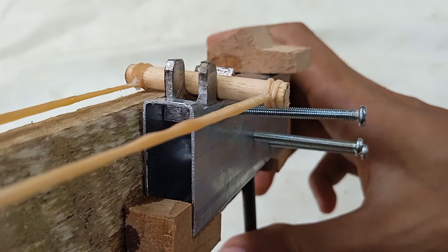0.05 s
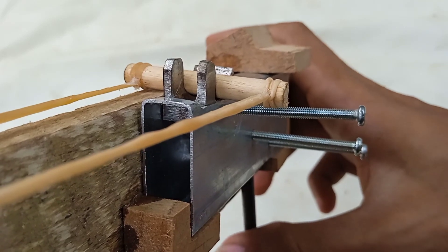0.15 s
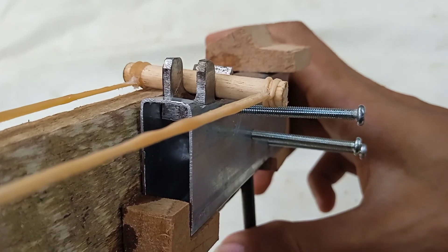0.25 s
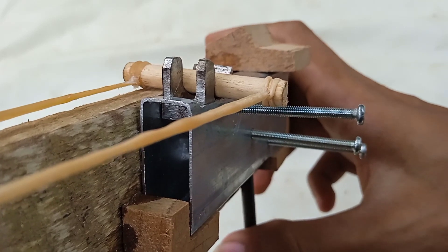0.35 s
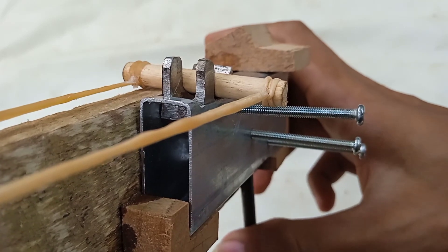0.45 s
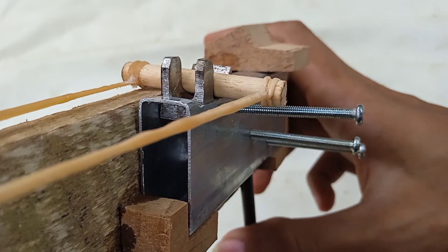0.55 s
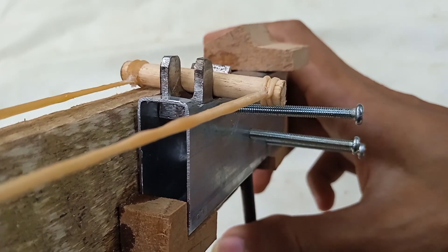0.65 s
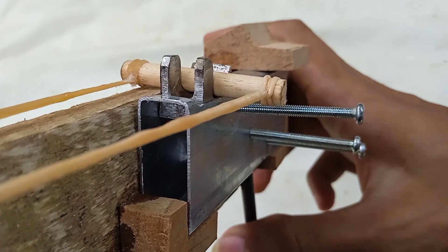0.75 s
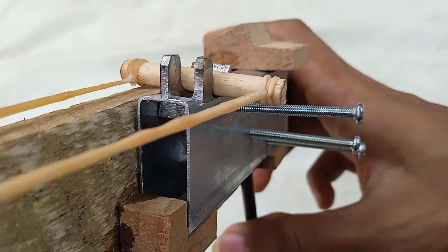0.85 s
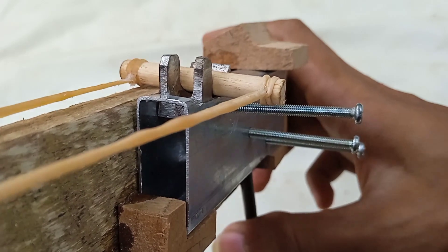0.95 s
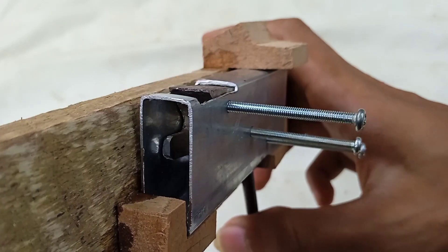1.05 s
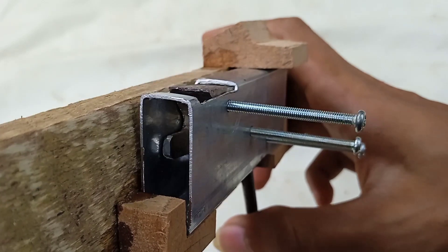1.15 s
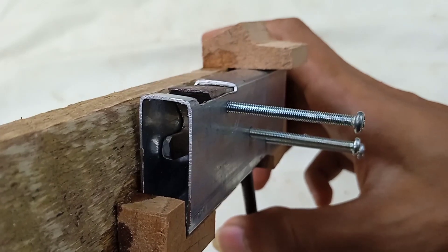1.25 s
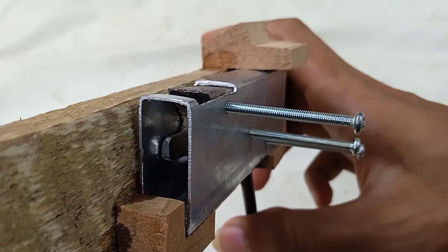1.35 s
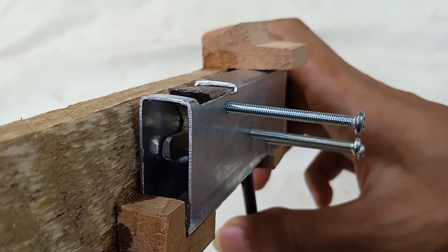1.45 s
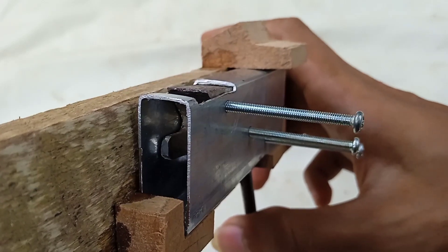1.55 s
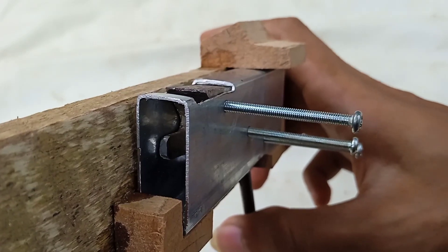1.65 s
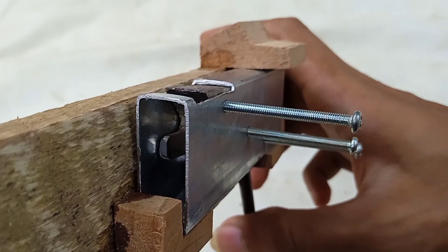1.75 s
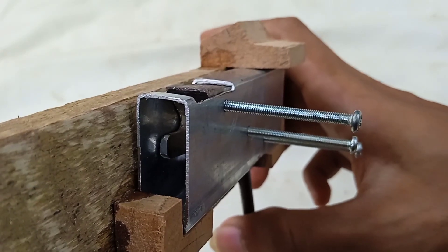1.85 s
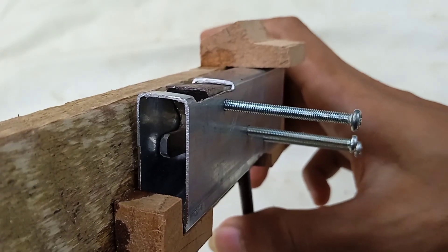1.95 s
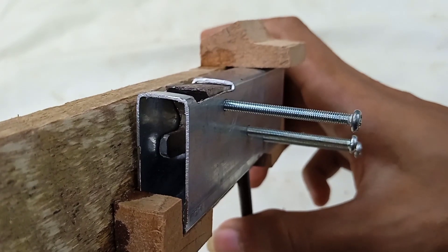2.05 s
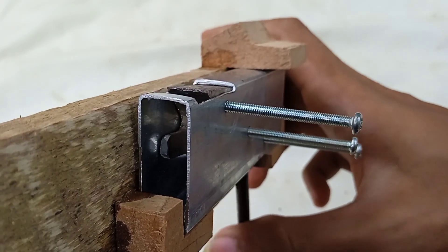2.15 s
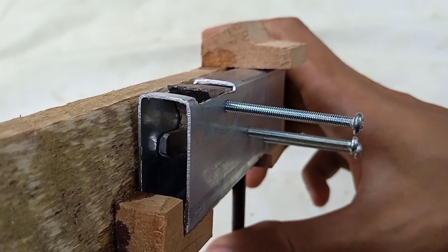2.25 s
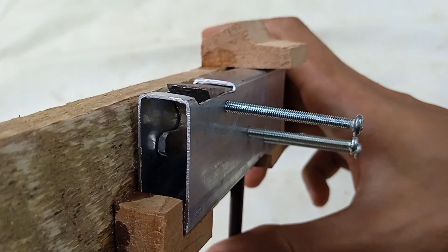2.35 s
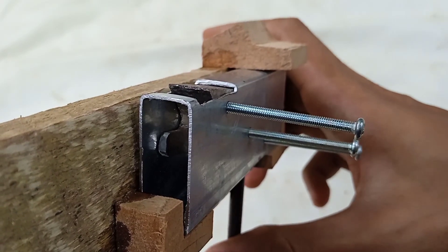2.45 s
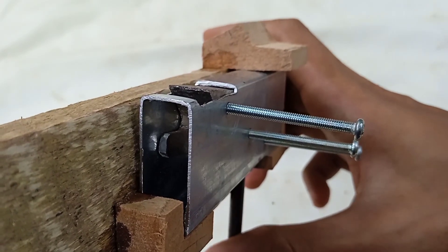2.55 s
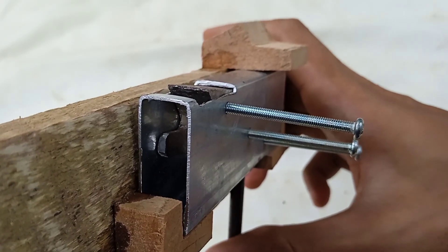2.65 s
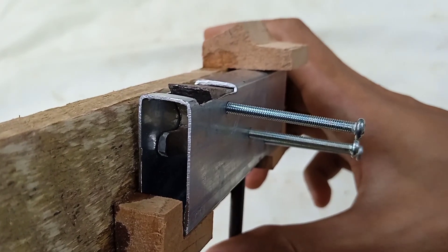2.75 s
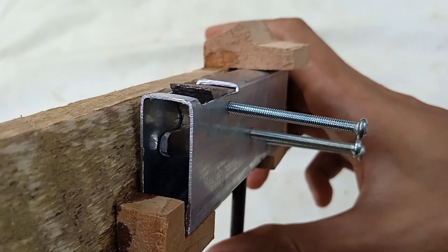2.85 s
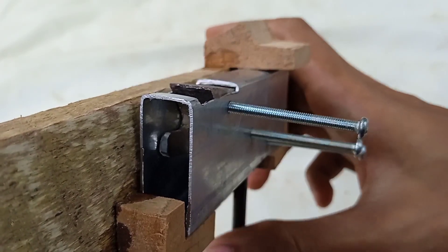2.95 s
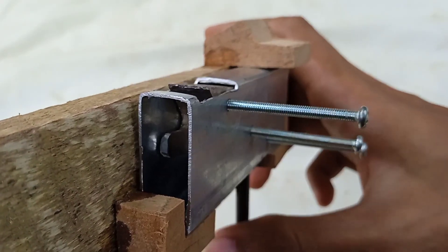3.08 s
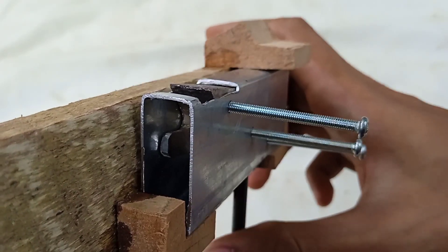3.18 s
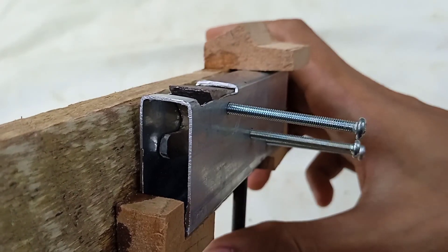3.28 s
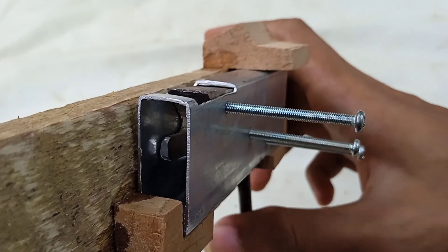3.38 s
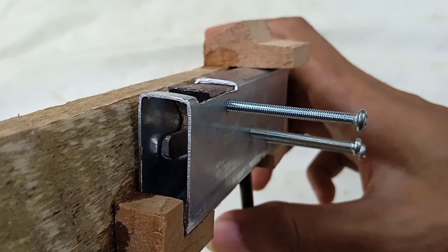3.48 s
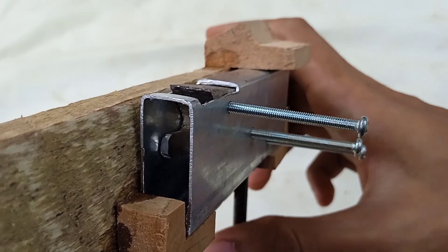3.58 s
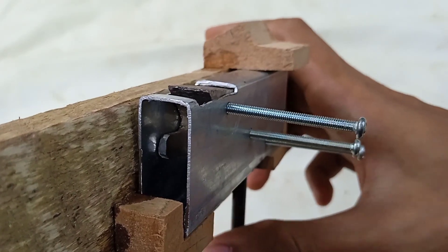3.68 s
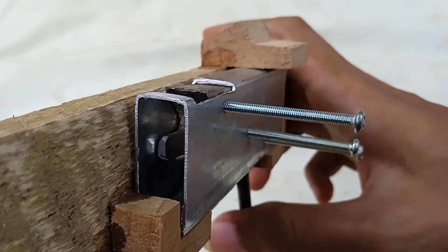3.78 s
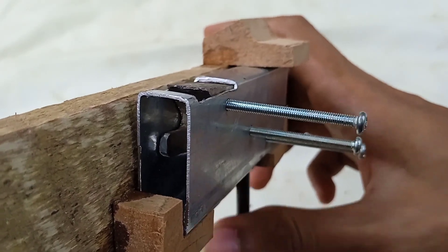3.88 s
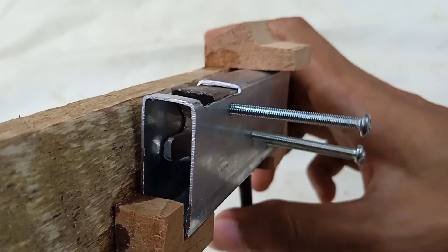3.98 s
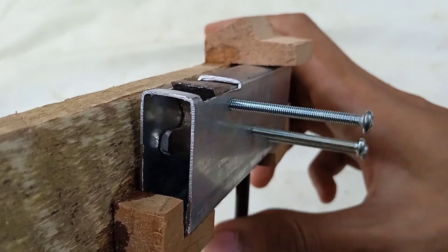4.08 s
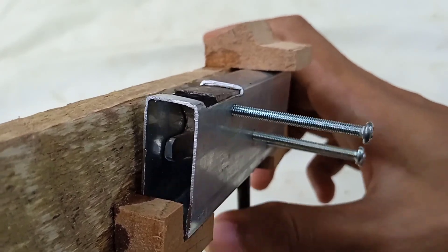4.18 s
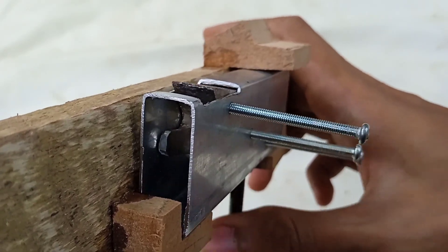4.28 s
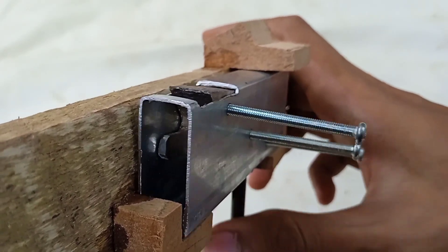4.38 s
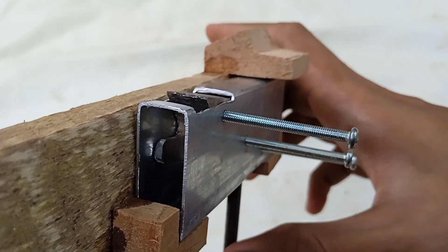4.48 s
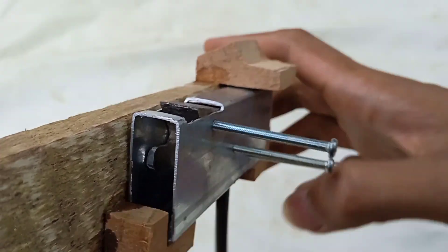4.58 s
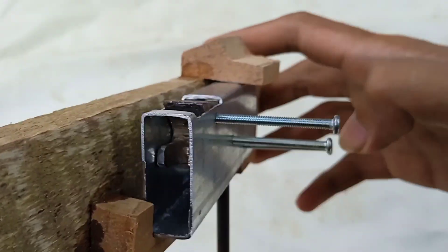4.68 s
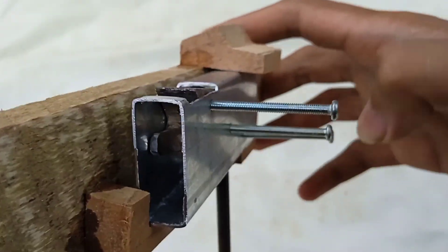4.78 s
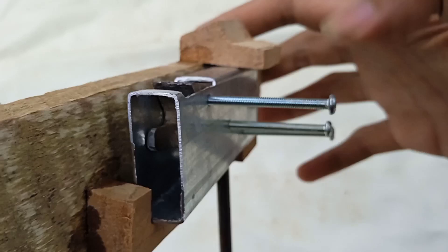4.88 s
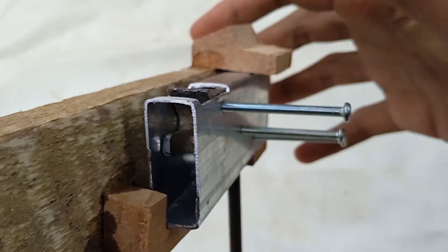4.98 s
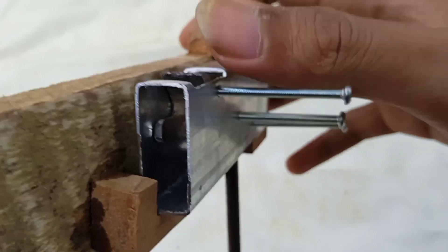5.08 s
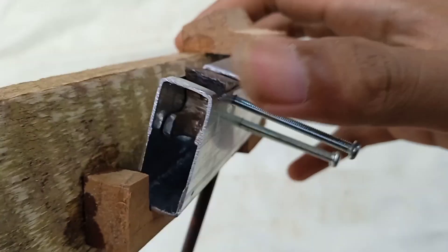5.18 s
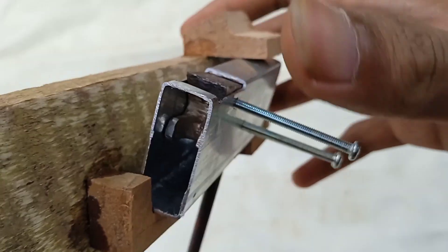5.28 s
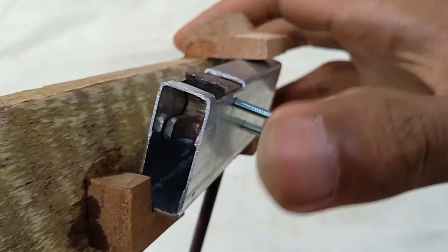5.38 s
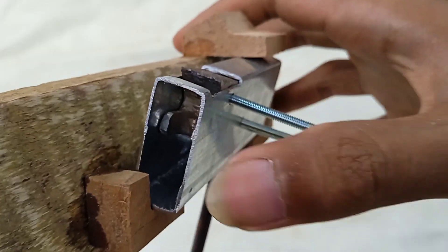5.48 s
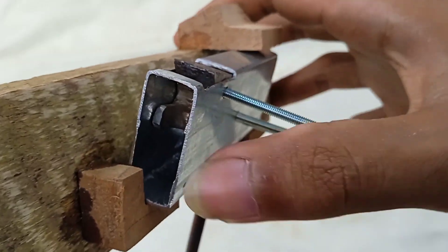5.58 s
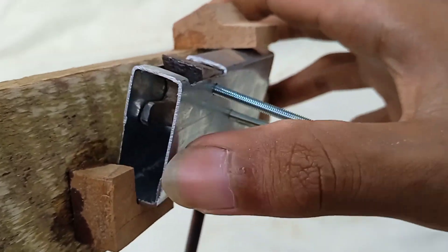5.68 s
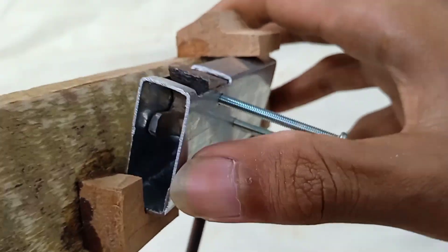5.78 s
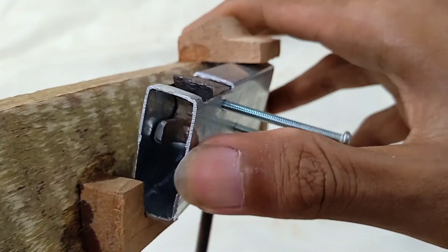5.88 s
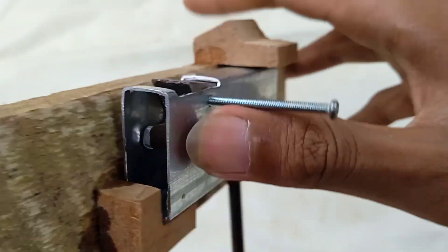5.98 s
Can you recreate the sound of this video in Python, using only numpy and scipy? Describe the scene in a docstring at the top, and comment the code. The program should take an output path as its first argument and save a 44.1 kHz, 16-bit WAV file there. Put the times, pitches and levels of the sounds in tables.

```python
"""First a low traffic rumble, a slowing far engine and a steadily trilling insect: shaped noise and tones.
A few far birds join in with gliding tones and bursts of high noise.
Close by, the steel catch of a homemade rubber-band crossbow lets go and slams round in its bracket on
the wooden stock: damped modes and noise. Then a hand works the trigger: loose screws scrape and click
in their holes, heard as grains of noise and small rings, and a thumb flicks their free ends."""
import sys
import numpy as np
from scipy import signal
from scipy.fft import rfft, irfft, next_fast_len
from scipy.io import wavfile
from scipy.ndimage import map_coordinates

SR = 44100
rng = np.random.default_rng(int(sys.argv[2]) if len(sys.argv) > 2 else 0)


def unload_wav(signal):
    """Save mono or channel-first audio to the path in sys.argv[1] as 16-bit WAV at rate SR, clipped to [-1, 1]."""
    wavfile.write(
        sys.argv[1],
        SR,
        np.round(np.clip(np.atleast_2d(signal).T, -1, 1) * 32767).astype(np.int16),
    )


N = 265923

# modes of the steel bracket: (frequency [Hz], level [dB], t60 [s])
STEEL = [(1670, -14.5, 0.021), (2178, 3, 0.018), (2436, -9.5, 0.043), (2530, -16, 0.053),
         (2775, -16.5, 0.046), (3410, -16.5, .02), (3842, -28, 0.053), (4650, -22, 0.021),
         (4980, -26.5, 0.015), (6144, -19.5, 0.04), (6750, -24.5, 0.016)]
# spectrum of the crack of rough steel faces: (frequency [Hz], relative density [dB per Hz])
CRACK = [(200, -28), (1000, -15.5), (2500, 1.5), (3200, -1), (4300, 3.5), (5000, -2.5), (6500, -1),
         (7600, -8), (10000, -10.5), (12800, -23), (14000, -17), (15200, -6), (16000, -7.5)]
# pushes of the hand that drag the screw threads over the bracket:
# (time of the hardest moment [s], rise [s], fall [s], level [dB])
STROKES = [(2.243, .02, 0.013, -67), (2.335, 0.091, 0.042, -69), (2.445, 0.052, 0.022, -70.5),
           (3.064, .026, 0.031, -56), (3.125, 0.036, 0.025, -72), (3.197, .056, 0.052, -60.5),
           (3.452, 0.049, 0.03, -55.5), (3.645, .062, .055, -56), (3.847, .048, .04, -53),
           (3.988, .055, 0.06, -54), (4.056, .032, 0.049, -53), (4.190, 0.065, 0.025, -52),
           (4.243, 0.023, 0.033, -53.5), (4.341, .048, 0.037, -47), (4.385, .02, .026, -49.5),
           (4.470, .046, .045, -53.5), (4.690, .02, .022, -55.5), (4.748, .022, 0.012, -57.5),
           (5.933, .016, 0.0286, -57), (5.988, .008, 0.0264, -62.5)]


def amp(db):
    """Level to amplitude: 20 dB is a factor of ten."""
    return 10 ** (np.asarray(db) / 20)


def unit(x):
    """Power normalisation: scale to rms 1."""
    return x / np.sqrt(np.mean(x ** 2) + 1e-20)


def blow(x):
    """Energy normalisation: scale to the energy of a full-scale sine lasting 5 ms."""
    energy = np.sum(x ** 2)
    return x * np.sqrt(0.0025 * SR / (energy + 1e-20))


def along(points, hz):
    """Interpolation of (frequency [Hz], value) points on a logarithmic frequency axis."""
    f, v = np.transpose(points)
    return np.interp(np.log(hz + 1), np.log(f + 1), v)


def curves(rows):
    """Linear interpolation in time: one value per sample for each column after the time."""
    s, *cols = np.transpose(rows)
    return [np.interp(np.arange(N) / SR, s, c) for c in cols]


def wobble(rate):
    """Band-limited random fluctuation: a smooth curve through random knots, rate of them a second."""
    knots = rng.standard_normal(int(N * rate / SR) + 4)
    return map_coordinates(knots, [np.arange(N) * rate / SR])


def filtered(x, response):
    """Linear filtering: the spectrum of x times a response of frequency."""
    m = next_fast_len(len(x) + 8192)
    spectrum = rfft(x, m) * response(np.fft.rfftfreq(m, 1 / SR))
    return irfft(spectrum, m)[:len(x)]


def noise(spectrum, size):
    """Spectral shaping: white noise coloured by a spectrum, of rms 1."""
    return unit(filtered(rng.standard_normal(size), lambda hz: amp(along(spectrum, hz))))


def add(track, s, x):
    """Superposition: mix x into the track at time s."""
    i = max(round(s * SR), 0)
    track[i:i + len(x)] += x[:max(len(track) - i, 0)]


def engine():
    """Harmonic orders: multiples of a steadily slowing firing rate, each fading in and out on its own."""
    # level of the far engine: (time [s], level [dB])
    engine_level = [(0, -61), (.4, -61), (1, -72), (1.7, -73), (2.6, -83), (3.25, -65), (4, -68),
                    (4.6, -71.5), (5.2, -75.5), (6, -70)]
    # orders: (multiple of the firing rate, relative level [dB])
    order_levels = [(2, -12), (3, 1), (4, -3), (5, -15.5), (6, -20.5)]
    firing_hz, sag_hz_per_s = 41.5, 1.65
    db, = curves(engine_level)
    hz = firing_hz - sag_hz_per_s * np.arange(N) / SR
    drift_hz = 0.25 * wobble(6)
    phase = 2 * np.pi * np.cumsum(hz + drift_hz) / SR
    orders = np.zeros(N)
    for multiple, level in order_levels:
        fading = amp(level + 2 * wobble(3))
        orders += fading * np.sin(round(multiple) * phase + 0.5 * wobble(8))
    return amp(db) * unit(orders)


def background():
    """Incoherent sum of sources: swelling traffic noise, hissing air, a faint hum and a far engine."""
    # levels of the distant traffic and of the hiss of air: (time [s], level [dB])
    traffic_level = [(0, -61), (.45, -64.5), (1.5, -67), (2.45, -71.5), (3.4, -67), (4.1, -69), (4.35, -71),
                     (4.6, -69), (5.1, -70.5), (6.03, -69.5)]
    air_level = [(0, -77), (.4, -75.5), (.9, -79), (2.5, -81), (6.03, -80.5)]
    # spectra of the traffic and of the air: (frequency [Hz], relative density [dB per Hz])
    rumble_spectrum = [(15, -59.5), (25, -31), (41, -20), (114, 0.5), (168, -7), (188, -7), (245, -12.5),
                       (274, -13.5), (348, -19.5), (436, -36.5), (500, -24.5), (650, -55.5), (1100, -120)]
    air_spectrum = [(200, -10), (400, 2.5), (700, -0.5), (1500, -6), (3000, -12.5), (4500, -18),
                    (7000, -19), (10000, -28), (13500, -26), (15000, -22), (16000, -17)]
    # the hum: (centre frequency [Hz], level [dB])
    hum_hz, hum_db = (347, -88)
    traffic_db, = curves(traffic_level)
    air_db, = curves(air_level)
    rumble = amp(traffic_db) * noise(rumble_spectrum, size=N)
    air = amp(air_db + 0.4 * wobble(5)) * noise(air_spectrum, size=N)
    hum_phase = 2 * np.pi * np.cumsum(hum_hz + wobble(1.3)) / SR
    hum = amp(hum_db) * unit(np.sin(hum_phase))
    return rumble + air + hum + engine()


def insect():
    """Modulated carrier: a thin tone creeping upward, with random sidebands heard as a fluttering trill."""
    # level of the insect: (time [s], level [dB])
    insect_level = [(0, -79), (1, -81.5), (1.7, -78), (2.8, -84.5), (4.8, -78.5), (6, -79)]
    start_hz, rise_hz_per_s = 5383, 12
    flutter_db = -1.5  # gain of the flutter beside the tone
    db, = curves(insect_level)
    phase = 2 * np.pi * np.cumsum(start_hz + rise_hz_per_s * np.arange(N) / SR) / SR
    tone = np.sin(phase + wobble(30))
    flutter = wobble(150) * np.sin(phase) + wobble(150) * np.cos(phase)
    return amp(db) * unit(tone + amp(flutter_db) * flutter)


def birds():
    """Frequency modulation for far whistles that glide and level off; band noise for short high buzzes."""
    # gliding whistles: (time [s], length [s], start frequency [Hz], end frequency [Hz], level [dB])
    whistles = [(3.735, 0.079, 3160, 4120, -74.5), (4.945, 0.13, 1158, 1114, -85.5),
                (5.65, 0.15, 3430, 4290, -80.5)]
    # a nearly flat note, repeated: (time [s])
    pip_times = [5.081, 5.30, 5.511, 5.766]
    # thin high buzzes: (time [s])
    buzz_times = [0.809, 1.27, 1.681, 2.52, 2.91, 3.32, 4.531, 4.84, 5.19, 5.68]
    pip_s, pip_start_hz, pip_end_hz, pip_db = 0.086, 3100, 2960, -83
    buzz_db = -90.5  # before its fading envelope
    out = np.zeros(N)
    pips = [(s, pip_s, pip_start_hz, pip_end_hz, pip_db) for s in pip_times]
    for s, length, start_hz, end_hz, db in whistles + pips:
        u = np.linspace(0, 1, round(length * SR))
        quaver_hz = 70 * wobble(400)[:len(u)]
        hz = start_hz + (end_hz - start_hz) * np.sin(np.pi / 2 * u) + quaver_hz
        envelope = np.sqrt(np.abs(np.sin(np.pi * u)))
        add(out, s, amp(db) * envelope * np.sin(2 * np.pi * np.cumsum(hz) / SR))
    u = np.linspace(0, 1, SR // 6)
    for s in buzz_times:
        buzz = noise([(5500, -40), (7000, -2.5), (8300, 0), (9200, -25)], size=len(u))
        add(out, s, amp(buzz_db) * buzz * np.minimum(7 * u, 1) * np.sqrt(1 - u))
    return out


def ring(modes, t, stretch, scatter_db):
    """Modal synthesis: a sum of damped sines, struck at new strengths and polarities each time."""
    hz, db, t60 = np.transpose(modes)[:, :, None]
    level = db + scatter_db * rng.standard_normal(hz.shape)
    sign = rng.choice([-1, 1], hz.shape)
    sines = np.sin(2 * np.pi * hz * stretch * t)
    return blow(np.sum(sign * amp(level - 60 * t / t60) * sines, axis=0))


def contact(modes, db, crack_db, knock_db, stretch, crack_t60):
    """Impact excitation: the struck steel rings, the rough faces crack, the stock knocks."""
    # modes of the wooden stock: (frequency [Hz], level [dB], t60 [s])
    stock_modes = [(346.5, -19.5, 0.058), (485, -13, 0.027), (608.5, -13, .02), (790.7, -6, 0.016),
                   (890, -2, .022), (1176, 0, .014)]
    t = np.arange(SR // 8) / SR
    steel = ring(modes, t, stretch, scatter_db=0.5)
    crack = blow(noise(CRACK, size=len(t)) * amp(-60 * t / crack_t60))
    wood = ring(stock_modes, t, 1 + 0.0077 * rng.standard_normal(), scatter_db=5)
    onset = 1 - np.exp(-t / 0.00069)
    return amp(db) * (steel + amp(crack_db) * crack + amp(knock_db) * wood) * onset


def snap(flex_db=8):
    """Repeated impact: the released catch rattles through its swing; each blow also flexes the bracket."""
    # the catch slips, tumbles, hits its stop and bounces:
    # (time [s], ring [dB], crack re ring [dB], knock re ring [dB])
    blows = [(1.0523, -43.5, -3.5, -19), (1.0526, -31, -9.5, -17.5), (1.0556, -28.5, 3, -16),
             (1.0590, -17.5, -7, -25.5), (1.0615, -24, -3.5, -23), (1.0635, -16, -11, -30.5),
             (1.0696, -28, -2.5, -16), (1.0726, -19.5, 0.5, -9.5), (1.0756, -19, -8, -12),
             (1.0800, -29.5, -5.5, -16.5), (1.1066, -38, -12.5, -15), (1.1154, -41, -4.5, -10)]
    # modes of the whole bracket flexing: (frequency [Hz], level [dB], t60 [s])
    flex_modes = [(1390, -5, 0.012), (1545, 2, .035), (1667, 4.5, .026), (2064, -3.5, .045),
                  (2620, -2.5, 0.034), (2880, -2.5, .022), (3210, -8, .021), (4320, -2.5, .013)]
    out, t = np.zeros(N), np.arange(SR // 8) / SR
    onset = 1 - np.exp(-t / 0.00057)
    for s, db, crack_db, knock_db in blows:
        stretch = 1 + 0.011 * rng.standard_normal()
        add(out, s, contact(STEEL, db, crack_db, knock_db, stretch, crack_t60=0.025))
        # the flexing follows the knock into the stock
        flex = ring(flex_modes, t, 1, scatter_db=2.0)
        add(out, s, amp(db + knock_db + flex_db) * onset * flex)
    return out


def grit(spectrum, grain_s):
    """Granular friction: dense, uneven tiny contacts with time constant grain_s, of rms 1 in all."""
    struck = rng.random(N) < 1400 / SR  # about 1400 contacts a second
    slips = struck * amp(3 * np.clip(rng.standard_normal(N), -2, 2))
    envelope = signal.lfilter([1], [1, -np.exp(-1 / (grain_s * SR))], slips)
    bursts = envelope * rng.standard_normal(N)
    return unit(filtered(bursts, lambda hz: amp(along(spectrum, hz))))


def rattle(start_s=1.082, db=-45, t60=0.3):
    """Exponential decay of many small contacts: the shot leaves every loose part chattering."""
    # spectrum of the shaken frame and slack bands: (frequency [Hz], relative density [dB per Hz])
    rattle_spectrum = [(200, -19), (450, -7), (880, -7.5), (1250, -10), (1650, -3), (2200, 0), (2750, -1.5),
                       (3100, -11), (4200, -6), (4800, -11), (10000, -14.5), (13000, -29.5), (15300, -10)]
    age = np.arange(N) / SR - start_s
    decay = (age > 0) * amp(db - 60 * np.abs(age) / t60)
    return decay * grit(rattle_spectrum, grain_s=0.0029)


def clicks():
    """Impact on a modal body: screws jump a thread; the ring shifts with the point of contact."""
    # clear clicks: (time [s], ring [dB], crack re ring [dB], knock re ring [dB], ring frequency [Hz])
    jumps = [(1.243, -58.5, -13, -25, 2206), (1.253, -61, -5, -14, 2670), (1.613, -74, -4, 0, 2035),
             (1.870, -60, -23, -9.5, 2570), (1.975, -73, -6, -11, 2450), (2.242, -67.5, 4, -9, 2170),
             (2.327, -49, -14, -19, 2200), (2.350, -62.5, -4, -3, 2140), (2.443, -57, -10, -9.5, 2340),
             (2.475, -60, -7, -5.5, 2500), (3.054, -52.5, -3, -9, 2456), (3.161, -45.5, -10.5, -16, 2450),
             (3.180, -48, -35, -10, 2200), (3.209, -50.5, -26.5, -10, 2670), (3.452, -44.5, -23, -18, 2220),
             (3.459, -43, -9.5, -18, 2430), (3.508, -50.5, -21, -28, 2140), (3.679, -48, -14, -15.5, 2190),
             (3.827, -43.5, -22, -14, 2390), (3.949, -50.5, 1, -18, 2330), (3.853, -42, -8, -26, 2210),
             (3.988, -44.5, -37, -32, 2210), (4.045, -38.5, -8.5, -28, 2170),
             (4.057, -35.5, -11, -37, 2230), (4.088, -48.5, -8, -16, 2700), (4.158, -48, -4, -16, 2420),
             (4.176, -44.5, -2.5, -30, 2530), (4.190, -35, -12.5, -34, 2136),
             (4.222, -39.5, -18, -16, 2240), (4.241, -38.5, -26.5, -25, 2270),
             (4.292, -53, -2.5, -19, 2250), (4.338, -34, -1.5, -35, 2314), (4.352, -39.5, -0.5, -25, 2020),
             (4.380, -37, -12.5, -16, 2256), (4.447, -45.5, -4, -33, 2060),
             (4.457, -37.5, -17.5, -29, 2180), (4.478, -36, -3.5, -24, 2162),
             (4.509, -46, -13, -20.5, 2274), (4.685, -43, -5, -8.5, 2350), (4.711, -46, -5.5, -15, 2100),
             (4.731, -50, -18, -12, 2380), (4.749, -50, -1.5, -8, 2170)]
    out = np.zeros(N)
    for s, db, crack_db, knock_db, hz in jumps:
        stretch = hz / STEEL[1][0]  # puts the second mode, the strongest, at hz
        add(out, s, contact(STEEL, db, crack_db, knock_db, stretch, crack_t60=0.037))
    return out


def push_db(age, rise, fall):
    """Pressure envelope: one push swells to its hardest moment and eases off."""
    edge_db, shape = 22, 2  # drop at the end of the rise or fall time; how rounded the top is
    return -edge_db * np.abs(age / np.where(age < 0, rise, fall)) ** shape


def catches(count=12):
    """Stick-slip friction: in a push the threads slip at an uneven pace, each slip a small ring and crack."""
    per_s, catch_db, scatter_db = 83, 0.5, 4.5  # mean pace, level re push [dB], greatest deviation [dB]
    mean_stretch, detune_range = 0.96, 0.051  # of the ring, relative to the bracket's modes
    crack_db, crack_t60 = -7, 0.021  # gain of the cracks [dB], decay time of each [s]
    rings, cracks, t = np.zeros(N), np.zeros(N), np.arange(SR // 25) / SR
    onset = 1 - np.exp(-t / 0.00039)
    burst = blow(onset * amp(-60 * t / crack_t60))
    for s, rise, fall, db in STROKES:
        for k, (late, size, detune) in enumerate(rng.uniform(-1, 1, (count, 3))):
            age = (k + 0.5 + 0.5 * late) / per_s - rise
            gain = amp(db + push_db(age, rise, fall) + catch_db + scatter_db * size)
            stretch = mean_stretch + detune_range * detune
            add(rings, s + age, gain * onset * ring(STEEL, t, stretch, scatter_db=0.5))
            add(cracks, s + age, gain * burst)
    # the crack envelopes modulate one continuous noise
    return rings + amp(crack_db) * cracks * noise(CRACK, size=N)


def scrape(level_db=-1):
    """Sliding friction: threads drag over the hole's edge, louder where they are pressed harder."""
    # spectrum of the scraping: (frequency [Hz], relative density [dB per Hz])
    scrape_spectrum = [(180, -60), (300, -20.5), (689, -13), (1580, -11.5), (2250, -2.5), (3520, -10.5),
                       (3800, -24), (4300, -15), (5700, -17.5), (6200, -20), (7820, -38), (9710, -39.5),
                       (12700, -38), (15000, -22), (16000, -28.5)]
    force, age = np.zeros(N), np.arange(-SR // 8, SR // 8) / SR
    for s, rise, fall, db in STROKES:
        add(force, s + age[0], amp(db + push_db(age, rise, fall)))
    return amp(level_db) * force * grit(scrape_spectrum, grain_s=0.0011)


def taps(knock_db=-22):
    """Impact on short bars: flicked screws click briefly, with a dip in the treble near 8.5 kHz."""
    # the thumb flicks the free ends of the screws:
    # (time [s], ring [dB], crack re ring [dB], ring frequency [Hz])
    flicks = [(5.1815, -49.5, -21, 2090), (5.1859, -49.5, 4, 2410), (5.2224, -59, -6, 2440),
              (5.2724, -50, -6.5, 2210), (5.566, -65, -15, 2290), (5.695, -42.5, -8.5, 2400),
              (5.9232, -46.5, -8, 2290), (5.9323, -38, -12, 2230), (5.9373, -47, -11, 2280),
              (5.986, -45, -8, 2450), (5.999, -59.5, -9, 2240)]
    # modes of a screw's free shank: (frequency [Hz], level [dB], t60 [s])
    shank_modes = [(2238, 7.5, 0.0089), (2374, -12.5, 0.043), (3140, -11.5, 0.019), (3360, -4, 0.017),
                   (3616, -11.5, 0.029), (4070, -28, 0.014), (4890, -16, 0.014), (6800, -20, 0.018)]
    out = np.zeros(N)
    for s, db, crack_db, hz in flicks:
        stretch = hz / shank_modes[0][0]  # puts the first mode at hz
        add(out, s, contact(shank_modes, db, crack_db, knock_db, stretch, crack_t60=0.019))
    return filtered(out, lambda hz: amp(along([(7000, 0.0), (8500, -4.5), (15000, 1.5)], hz)))


def radiated(x, corner_hz=300):
    """Radiation efficiency: small parts move too little air to give off bass."""
    return signal.sosfilt(signal.butter(2, corner_hz, "highpass", fs=SR, output="sos"), x)


def room(x, wet_db):
    """Diffuse reverberation: the walls' answer builds up over a few milliseconds, then decays."""
    # reverberation time: (frequency [Hz], t60 [s])
    decay_times = [(200, 0.32), (900, .25), (2000, .33), (6000, 0.41), (15000, .27)]
    hz, t, z = signal.stft(rng.standard_normal(SR // 2), SR, nperseg=256)
    decay = amp(-60 * t / along(decay_times, hz)[:, None])
    build_up = 1 - np.exp(-t / 0.0066)
    tail = signal.istft(z * decay * build_up, SR, nperseg=256)[1]
    return x + amp(wet_db) * signal.fftconvolve(x, tail / np.linalg.norm(tail))[:N]


def scene():
    """Direct-to-reverberant balance: the mechanism sounds close up, the birds far off."""
    shot = room(radiated(snap() + rattle()), wet_db=-26.5)
    handling = room(radiated(clicks() + catches() + taps() + scrape(), corner_hz=202), wet_db=-26.5)
    return (shot + handling + room(birds(), wet_db=-8) + insect() + background())[None]


def record(dry):
    """Low-pass filtering: the microphone's steep band limit."""
    top_hz = 15870
    return filtered(dry[0], lambda hz: 1 / np.sqrt(1 + (hz / top_hz) ** 240))[None]


dry = scene()
out = record(dry)
unload_wav(out)
```